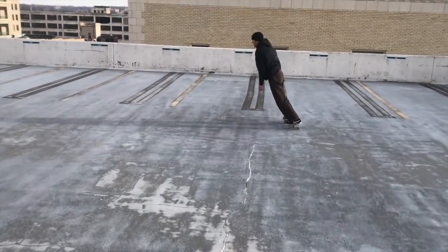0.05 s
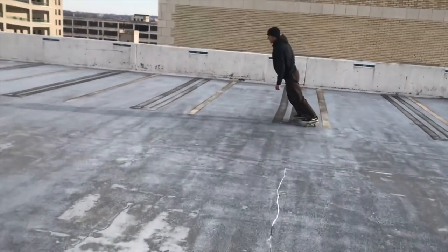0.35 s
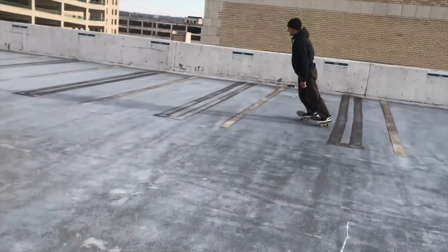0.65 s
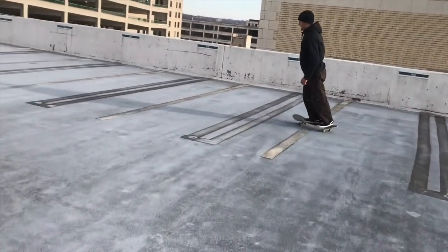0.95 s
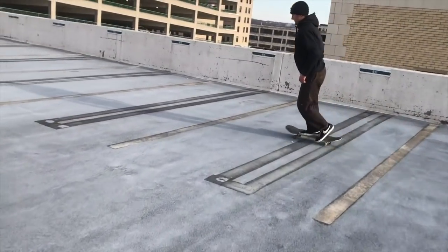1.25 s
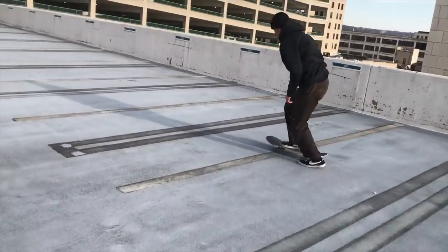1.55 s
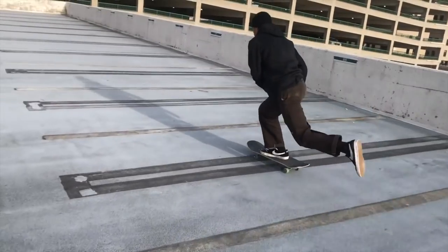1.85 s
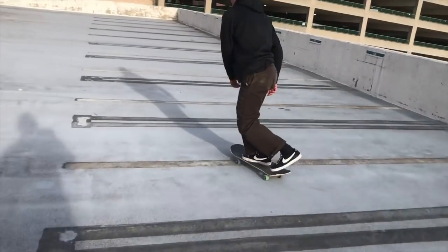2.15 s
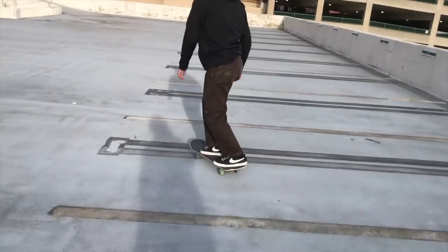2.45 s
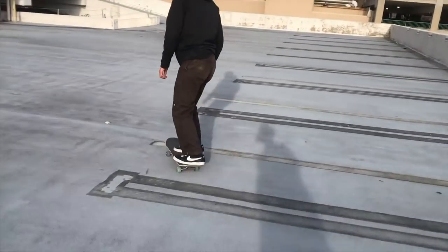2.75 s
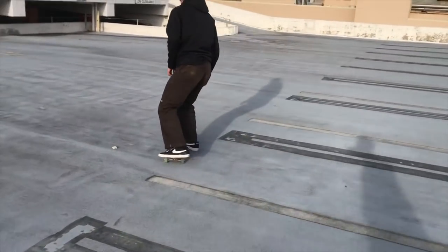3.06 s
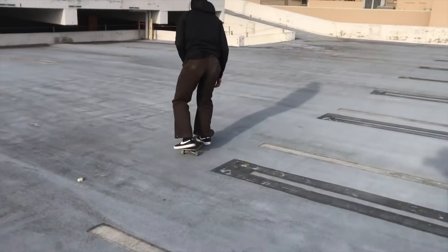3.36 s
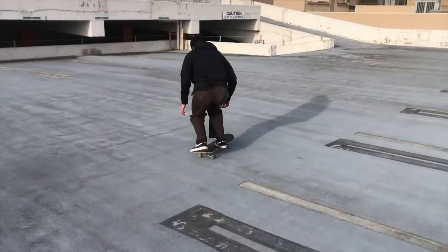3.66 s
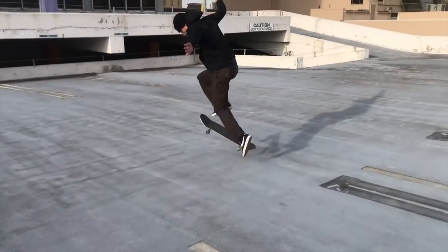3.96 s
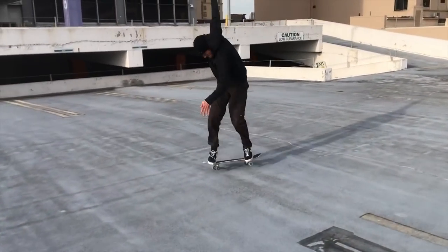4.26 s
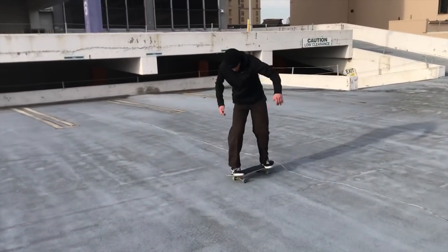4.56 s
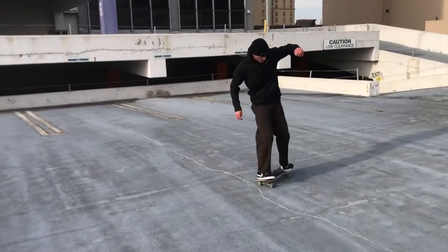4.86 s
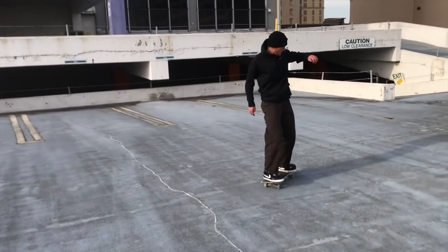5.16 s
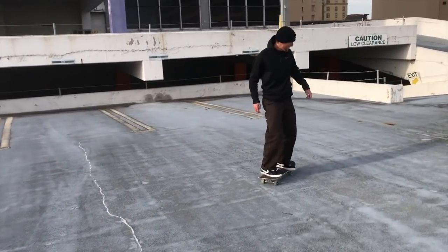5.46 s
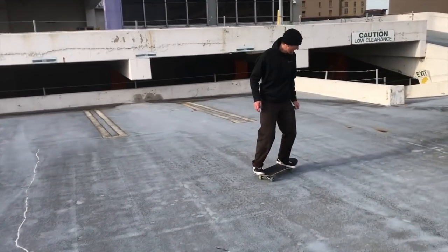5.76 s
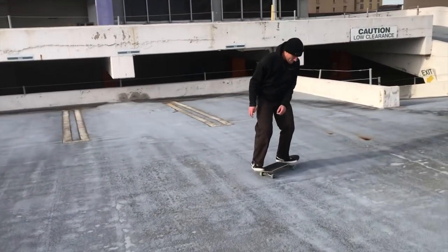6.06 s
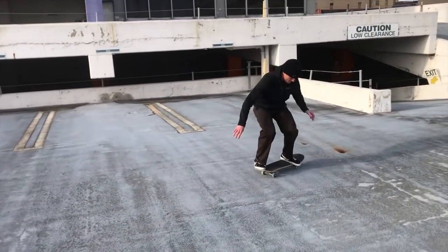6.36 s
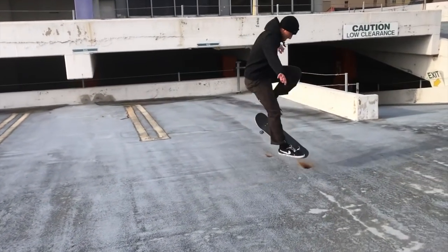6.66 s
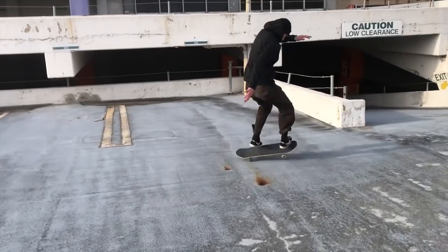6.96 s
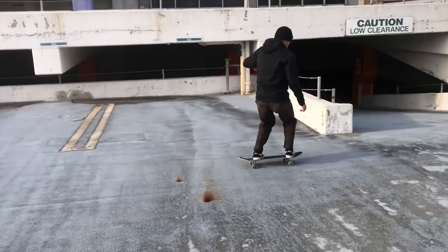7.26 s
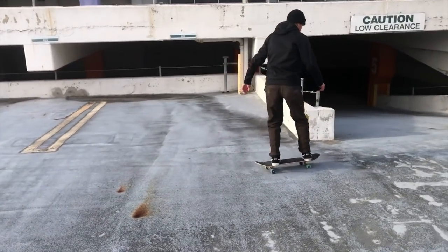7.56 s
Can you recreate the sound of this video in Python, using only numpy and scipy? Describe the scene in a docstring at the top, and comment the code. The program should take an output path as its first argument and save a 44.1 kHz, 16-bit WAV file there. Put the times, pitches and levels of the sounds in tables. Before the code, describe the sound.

Two skateboards roll across a concrete deck in low wind; one jumps twice, its wooden tail clacking and its wheels slamming down.

```python
"""Two skateboards roll over a rooftop parking deck, heard at a phone carried by the rider behind.
From the start, grit under the hard wheels makes the boards roar and the slab rumble; bearings hiss and
wind buffets the microphone. In the first second the wheels knock over cracks and one slips in a carve.
Near 4.0 s and again near 6.7 s the skater ahead pops the tail and lands about 0.4 s later: each blow
clacks through the maple deck and echoes off the parapet, and the phone rounds the loudest peaks."""
import sys
import numpy as np
from scipy import signal
from scipy.fft import rfft, irfft
from scipy.io import wavfile
from scipy.ndimage import uniform_filter1d, map_coordinates

SR = 44100
rng = np.random.default_rng(int(sys.argv[2]) if len(sys.argv) > 2 else 0)


def transcribe(u):
    """Save the signal u as a 16-bit wav file named by the first command-line argument.

    u: samples, shape (n,) or (channels, n), limited to [-1, 1]; the rate is SR.
    q: integer samples, one column per channel.
    """
    v = np.clip(np.atleast_2d(u).T, -1, 1)
    q = np.round(v * 32767).astype(np.int16)
    wavfile.write(sys.argv[1], SR, q)


N = 340011
TIME = np.arange(N) / SR

# spectral envelopes: f/Hz, level/dB
BOARD_SPECTRUM = [(90, -10.5), (220, 0.5), (350, 0), (500, 2), (700, -2.5), (880, -13), (1300, -26),
                  (2200, -56), (5000, -74.5)]
WHEEL_SPECTRUM = [(500, -12.5), (900, -7), (1180, -1.5), (1400, -8.5), (1620, -14), (2000, -23.5),
                  (4000, -54)]
GRIT_SPECTRUM = [(500, -25), (1000, -13), (2100, -2), (2650, 1.5), (3100, -2), (3700, -5), (4800, -12.5),
                 (6500, -23)]
BEARING_SPECTRUM = [(2000, -25), (4800, -14), (5250, -2), (5550, -1), (5850, 3), (6400, -6), (7100, -9),
                    (7700, -19), (9800, -20)]
TREAD_SPECTRUM = [(4000, -12), (7000, 0), (7700, -3), (8600, 3.5), (9800, 2), (10400, -5), (11500, -1),
                  (16000, -4)]
# base levels of wheel ring (follows pace) and bearing whir (follows nearness): t/s, level/dB
WHEEL_LEVEL = [(0.0, -28.5), (0.36, -26), (1.01, -28.5), (1.8, -26), (2.51, -32), (3.84, -33), (6.12, -37)]
BEARING_LEVEL = [(0.0, -61.5), (1.01, -60.5), (1.59, -55), (2.1, -58), (3.0, -61.5), (4.27, -73.5),
                 (4.38, -63), (5.78, -68), (7.71, -65.4)]
# swells and dips of the rolling, and one short low thump: t/s, half length/s, slab/dB, board/dB
SWELLS = [(0.065, 0.029, 12.5, -4.5), (0.248, 0.17, -1, 3), (0.513, 0.091, 2, 4), (0.809, 0.15, 1.5, 4.5),
          (2.243, 0.068, 6, 2.5), (2.79, 0.057, 7, 2.5), (2.906, 0.074, -10, -1), (3.155, 0.24, 4, 1),
          (5.08, 0.19, 0.5, 2.5), (6.998, 0.013, 8, 8.5), (7.23, 0.22, 5.5, 0.5)]
# tail strikes and wheel slams: t/s, level/dB, chatter/s, then relative treble, thud, rattle, clang/dB
POPS = [(3.96, -24.5, 0.02, 9, -6, -34, -30), (6.662, -16, 0.009, 2.5, -7, -38, -18),
        (6.672, -32.5, 0.012, 7, -3, -11, -22)]
LANDINGS = [(4.3223, -15.5, 0.009, -8, -0.5, -30, -20), (4.332, -18, 0.008, -9, 1, -28, -24),
            (4.363, -21, 0.013, -2, -1, -22, -22), (4.3675, -15.5, 0.004, -6, -3, -24, -22),
            (4.393, -17.5, 0.022, -1, -5, -30, -11.5), (4.414, -17, 0.02, -1, -6, -29, -9.5),
            (7.0465, -13, 0.004, 3, -2.5, -30, -20), (7.053, -24, 0.011, -5, 4, -33, -17),
            (7.073, -13.5, 0.018, -4, 1.5, -24, -19), (7.094, -22.5, 0.006, 1, 0, -21, -22)]


def rolling():
    """Roughness excitation: one surface modulates all rolling sounds; all but the slab thin in a jump."""
    pace_db = curve(WHEEL_LEVEL) + 30  # 0 at an ordinary pace
    patches, specks = walk(per_s=36), walk(per_s=140)
    rumble = slab_rumble(patches)
    boards = (board_roar(pace_db, patches) + wheel_ring(patches)
              + crushed_grit(pace_db, patches, specks) + bearing_whir(patches, specks))
    sizzle = tread_sizzle(patches, specks)
    flight = airborne()
    return rumble + boards * undb(-0.5 * flight) + sizzle * undb(-4 * flight)


def slab_rumble(patches):
    """Structure-borne sound: impacts of the wheels drive the concrete slab at low frequencies."""
    spectrum = [(45, -19.5), (95, -2.5), (150, 0.5), (240, -2), (370, -11.5), (600, -30.5), (1400, -75)]  # slab response: f/Hz, level/dB
    base_level = [(0.0, -20.5), (1.61, -19.5), (2.08, -14), (4.06, -20), (4.34, -14.5), (7.52, -17.5)]  # slab under the phone: t/s, level/dB
    swell_db = sum(db * swell(s, half_s) for s, half_s, db, _ in SWELLS)
    rumble = unit(through(grains(per_s=1000, spread_db=1), colour(spectrum)))
    return rumble * undb(curve(base_level) + swell_db + patches)


def board_roar(pace_db, patches):
    """Forced vibration: rough concrete shakes the boards, more strongly with pace."""
    swell_db = sum(db * swell(s, half_s) for s, half_s, _, db in SWELLS)
    roar = unit(through(grains(per_s=2200, spread_db=2.5), colour(BOARD_SPECTRUM)))
    return roar * undb(-17.5 + 0.55 * pace_db + swell_db + 1.04 * patches)


def wheel_ring(patches):
    """Resonance: the urethane wheels ring in a band that shifts as the boards turn and move."""
    centre = [(0.0, 1066), (1.9, 1153), (2.902, 1317), (3.7, 1250), (4.6, 1156)]  # peak of the ring: t/s, f/Hz
    ringing = gliding_colour(grains(per_s=2400, spread_db=0.5), WHEEL_SPECTRUM, centre)
    return ringing * undb(curve(WHEEL_LEVEL) + 0.82 * patches)


def crushed_grit(pace_db, patches, specks):
    """Fracture noise: grit crackles louder with pace, nearness and the load of a crouch before a pop."""
    centre = [(0.8, 2354), (2.3, 2654), (3.4, 3103), (4.1, 3343), (4.6, 2404), (6.401, 2647)]  # peak of the crackle: t/s, f/Hz
    crouches = [(3.896, 0.094, 4.5), (6.358, 0.2, 2)]  # wheels pressed into the grit: t/s, half length/s, gain/dB
    crouch_db = sum(db * swell(s, half_s) for s, half_s, db in crouches)
    nearness_db = curve(BEARING_LEVEL) - curve(BEARING_LEVEL).mean()
    level_db = -50 + 0.39 * pace_db + 0.31 * nearness_db + crouch_db
    crackle = gliding_colour(grains(per_s=2200, spread_db=1), GRIT_SPECTRUM, centre)
    return crackle * undb(level_db + 1.1 * patches + specks)


def bearing_whir(patches, specks):
    """Shot noise: dense ticks in the bearings merge into a hiss, loudest while the skater is close."""
    whir = unit(through(grains(per_s=9000, spread_db=8), colour(BEARING_SPECTRUM)))
    return whir * undb(curve(BEARING_LEVEL) + patches + 1.1 * specks)


def tread_sizzle(patches, specks):
    """Adhesion noise: the tread peels off fine dust in tiny, bright impulses."""
    base_level = [(0.0, -64.5), (1.15, -65), (1.7, -61.5), (2.0, -63.5), (2.25, -60.5), (2.62, -60.5),
                  (2.85, -65.5), (3.6, -69.5), (3.9, -67), (4.7, -70), (7.71, -72)]  # peeling tread: t/s, level/dB
    sizzle = unit(through(grains(per_s=13000, spread_db=5.5), colour(TREAD_SPECTRUM)))
    return sizzle * undb(curve(base_level) + 1.3 * patches + 1.3 * specks)


def airborne():
    """Loss of contact: one gate from each tail strike to landing, summing to 2 in the second jump."""
    flights = [(pop[0], min(row[0] for row in LANDINGS if row[0] > pop[0])) for pop in POPS]
    gates = sum(1. * (TIME > up) * (TIME < down) for up, down in flights)
    return uniform_filter1d(gates, int(0.045 * SR))


def tricks():
    """Friction and impact: feet shuffle, the tail pops, light clacks follow and the wheels land."""
    scuffs = [(1.725, -39, 0.032, 11), (3.775, -44, .04, 6), (5.68, -44, 0.089, 14)]  # soles on grip tape or ground: t/s, level/dB, chatter/s, treble/dB
    # light clacks during the jumps, and the slap echo of the second pop: columns as for scuffs
    clacks = [(4.03, -44, 0.03, 7), (4.075, -42.5, 0.022, 12), (4.209, -31, 0.024, -8),
              (6.703, -31.5, 0.024, -3), (6.755, -39.5, 0.019, 5), (6.815, -43, .018, 9.5),
              (6.880, -34, 0.0055, 5), (6.9, -38, .04, 1)]
    return (blows(scuffs, bite_hz=7000, top_db=-2, thud_db=-22.5, rattle_db=-13, clang_db=-20)
            + blows(POPS, bite_hz=3600, top_db=-11.5)
            + blows(clacks, bite_hz=3800, top_db=-17.5, thud_db=-2.5, rattle_db=-31, clang_db=-22.5)
            + blows(LANDINGS, bite_hz=5900, top_db=-6))


def blows(table, **kind):
    """Superposition: the contacts of a table add up; kind holds the settings they share."""
    out = np.zeros(N)
    for s, *row in table:
        add(out, s, contact(*row, **kind))
    return out


def contact(db, length_s, treble_db, thud_db, rattle_db, clang_db, bite_hz, top_db):
    """Impact excitation: a blow with its own level and brightness drives deck, wheels and trucks."""
    # modes of the struck deck with its trucks, and of the hangers: f/Hz, bandwidth/Hz, level/dB
    deck_modes = [(270, 110, 6), (500, 180, 5), (830, 90, 1), (1070, 80, 2), (1250, 80, 0), (1510, 90, 1.5),
                  (1780, 70, -3), (2170, 60, -5), (2420, 70, -8), (2610, 60, -7), (2985, 50, -9),
                  (3410, 60, -12), (3760, 50, -16), (4250, 130, -20), (4655, 50, -16), (5250, 70, -17),
                  (5645, 60, -19)]
    hanger_modes = [(2650, 650, 0)]
    # contact crack and rattling steel trucks: f/Hz, level/dB
    crack_spectrum = [(100, -6), (500, 5), (1400, 1), (3000, -9), (4200, -16), (6000, -17), (8500, -26)]
    truck_spectrum = [(2500, -22), (4500, -9), (5400, 3), (6500, 2.5), (8500, 1.5), (10300, -8),
                      (12500, -4), (16000, -8.5)]
    high_db = treble_db + top_db
    brightness = colour([(600, 0), (bite_hz, treble_db), (9000, high_db), (SR / 2, high_db)])
    force = burst(length_s, slam=0.41)
    wood = through(through(force, brightness), ring(deck_modes) + undb(5.5) * colour(crack_spectrum))
    parts = [(colour(BOARD_SPECTRUM), thud_db), (colour(WHEEL_SPECTRUM), thud_db - 14),
             (colour(truck_spectrum), rattle_db), (ring(hanger_modes), clang_db)]
    return at_level(wood, db) + sum(at_level(through(force, part), db + rel_db) for part, rel_db in parts)


def ring(modes, size=8192):
    """Damped normal modes: the place of contact weights them, the rider's load detunes them a little."""
    t = np.arange(size) / SR
    hz, width, db = np.transpose(modes)[:, :, None]
    place, load = rng.standard_normal((2, len(modes), 1))
    weight = np.sign(place) * undb(db + 1.2 * np.abs(place) + 3) * 2 * np.pi * width / SR
    detuned = hz * (1 + .008 * load)
    return np.sum(weight * np.exp(-np.pi * width * t) * np.sin(2 * np.pi * detuned * t), axis=0)


def bumps():
    """Transient excitation: a wheel drops over an edge, knocking the board, ringing and clicking."""
    edges = [(.281, -15.5, -25.5, -55), (.465, -10.5, -27, -42), (0.483, -17, -24, -44),
             (.543, -11, -31, -52), (.553, -11.5, -20.5, -46), (.745, -16, -23.5, -55),
             (2.245, -19, -30, -45.5), (2.376, -21, -30, -47), (2.977, -25, -26.5, -50),
             (6.012, -17.5, -42, -62), (6.189, -17, -37, -67)]  # cracks, pebbles, paint stripes: t/s, knock/dB, ring/dB, click/dB
    body, wheel = colour(BOARD_SPECTRUM), colour(WHEEL_SPECTRUM)
    click = (colour(GRIT_SPECTRUM) + undb(-11) * colour(BEARING_SPECTRUM)
             + undb(-23) * colour(TREAD_SPECTRUM))
    out = np.zeros(N)
    for s, *levels_db in edges:
        force = burst(length_s=.006, slam=.7)
        for part, db in zip((body, wheel, click), levels_db):
            add(out, s, at_level(through(force, part), db))
    return out


def carve(centre_s=.7, half_s=.32, slips_per_s=13.5):
    """Stick-slip friction: leaning into the turn, a wheel slips and grips in a run of thin swishes."""
    spectrum = [(7400, -16), (8400, 2), (9600, -2), (10500, -14.5)]  # wheel slipping sideways: f/Hz, level/dB
    slips = np.cos(np.pi * slips_per_s * (TIME - centre_s)) ** 4
    swish = unit(through(rng.standard_normal(N), colour(spectrum)))
    return swish * slips * swell(centre_s, half_s) * undb(-63)


def rooftop(x, t60_s, tail_db, echo_s, echo_db, damp_hz):
    """Reflection in open air: a smeared slap from the parapet and a thin, dull tail from the ramps."""
    t = TIME[:SR]
    tail = rng.standard_normal(SR) * undb(-60 * t / t60_s) * (1 - np.exp(-t / 0.024))
    slap = rng.standard_normal(SR) * np.exp(-((t - echo_s) / 0.023) ** 2)
    response = undb(tail_db) * tail / np.linalg.norm(tail) + undb(echo_db) * slap / np.linalg.norm(slap)
    return through(x, signal.sosfilt(signal.butter(1, damp_hz, fs=SR, output="sos"), response))


def wind():
    """Turbulent pressure: eddies rumble at the microphone; the same noise gives one landing its thump."""
    spectrum = [(22, -39), (32, -23.5), (45, -7.5), (63, -3), (100, -5), (140, -13), (250, -33.5),
                (700, -81.5)]  # eddies: f/Hz, level/dB
    breeze = [(0.0, -14), (1.2, -21.5), (1.93, -14), (3.8, -14), (5.4, -12), (7.1, -14)]  # base level of the wind: t/s, level/dB
    # a lull in the wind, and the low thump of the first landing: t/s, half length/s, gain/dB
    lull_and_thump = [(2.887, 0.027, -4.5), (4.459, 0.023, 6)]
    eddies = unit(through(rng.standard_normal(N), colour(spectrum)))
    swell_db = sum(db * swell(s, half_s) for s, half_s, db in lull_and_thump)
    return eddies * undb(curve(breeze) + swell_db - 0.05 * walk(per_s=6.9))


def air(level_db):
    """White noise: a faint, even hiss under everything."""
    return rng.standard_normal(N) * undb(level_db)


def grains(per_s, spread_db):
    """Poisson process: tiny impacts at random moments, of log-normal size."""
    hit = rng.random(N) < per_s / SR
    return unit(hit * rng.choice([-1, 1], N) * undb(spread_db * rng.standard_normal(N)))


def burst(length_s, slam, size=8192):
    """Contact force: a short slam on top of chatter that dies away after length_s."""
    t = np.arange(size) / SR
    chatter = np.exp(-(t / length_s) ** 4)
    return rng.standard_normal(size) * (chatter + slam * np.exp(-t / 0.0028))


def colour(points, size=8192):
    """Minimum-phase response of an (f/Hz, level/dB) outline, falling 20 dB an octave past its end."""
    hz, db = np.transpose(points)
    octave = np.log2(np.maximum(np.fft.rfftfreq(size, 1 / SR), 1))
    outline = np.interp(octave, np.log2(hz), db) - 20 * np.maximum(octave - np.log2(hz[-1]), 0)
    cepstrum = irfft(np.log(undb(outline)))
    cepstrum[1:size // 2] *= 2  # folding the cepstrum makes the response causal
    cepstrum[size // 2 + 1:] = 0
    return irfft(np.exp(rfft(cepstrum)))


def gliding_colour(x, points, centre):
    """Frequency scaling: filter x, then resample so its spectral peak follows a (t/s, f/Hz) curve."""
    peak_hz = max(points, key=lambda point: point[1])[0]
    place = np.cumsum(curve(centre) / peak_hz)
    return unit(map_coordinates(through(x, colour(points)), [place], mode="wrap"))


def walk(per_s):
    """Random modulation: ramps between Gaussian values, at rms 1."""
    hold = int(SR / per_s)
    steps = np.repeat(rng.standard_normal(N // hold + 1), hold)
    return unit(uniform_filter1d(steps, hold)[:N])


def swell(centre_s, half_s):
    """Gaussian envelope: 1 at its centre, 1/e at half_s to either side."""
    return np.exp(-((TIME - centre_s) / half_s) ** 2)


def curve(table):
    """Linear interpolation of a (t/s, value) table at every sample."""
    return np.interp(TIME, *np.transpose(table))


def through(x, response):
    """Convolution with an impulse response."""
    return signal.fftconvolve(x, response)[:len(x)]


def at_level(x, db):
    """Equivalent level: scale x so that its energy, spread over 20 ms, has this level."""
    return x * undb(db) * np.sqrt(.02 * SR) / np.linalg.norm(x)


def add(out, s, x):
    """Superpose x on out from time s on."""
    i = int(s * SR)
    out[i:i + len(x)] += x[:N - i]


def unit(x):
    """Normalisation to rms 1."""
    return x / np.sqrt(np.mean(x ** 2))


def undb(db):
    """Decibels to amplitude ratio."""
    return 10 ** (np.asarray(db) / 20)


def scene():
    """Superposition at one microphone: rolling, tricks with their echoes, and wind."""
    clacks = tricks()
    echoes = rooftop(clacks, t60_s=.5, tail_db=-10.5, echo_s=0.084, echo_db=-26.5, damp_hz=3800)
    return (rolling() + carve() + bumps() + clacks + echoes + wind() + air(level_db=-72.5))[None]


def record(dry):
    """Saturation and band limiting: the phone flattens peaks at full scale and cuts the top."""
    top_hz = 15750
    rounded = dry / (1 + dry ** 20) ** (1 / 20)
    return signal.sosfilt(signal.ellip(8, .2, 70, top_hz, fs=SR, output="sos"), rounded)


dry = scene()
out = record(dry)
transcribe(out)
```